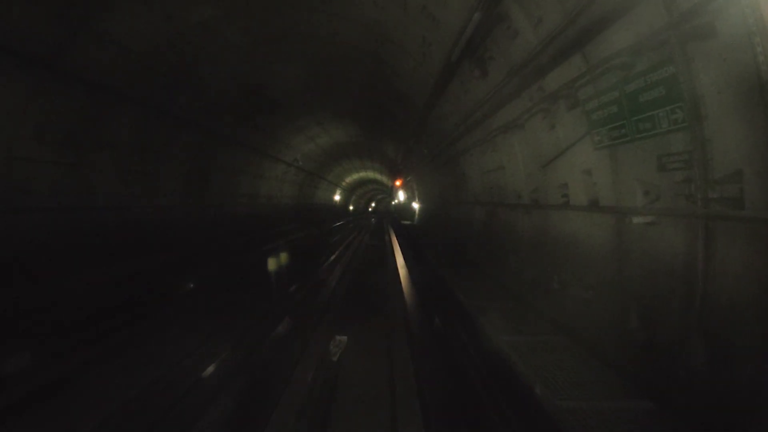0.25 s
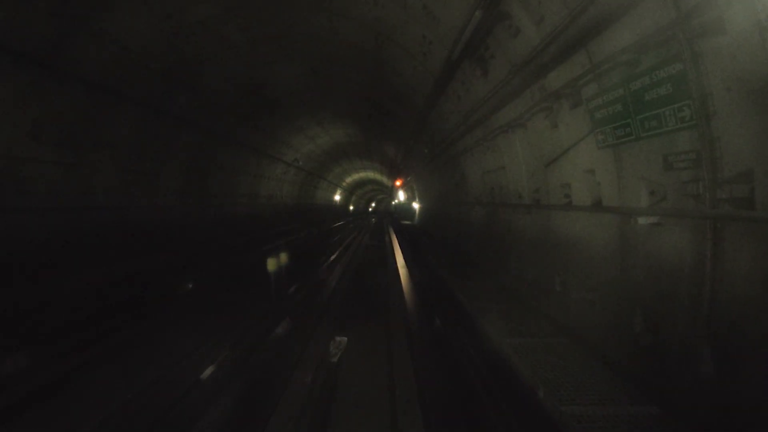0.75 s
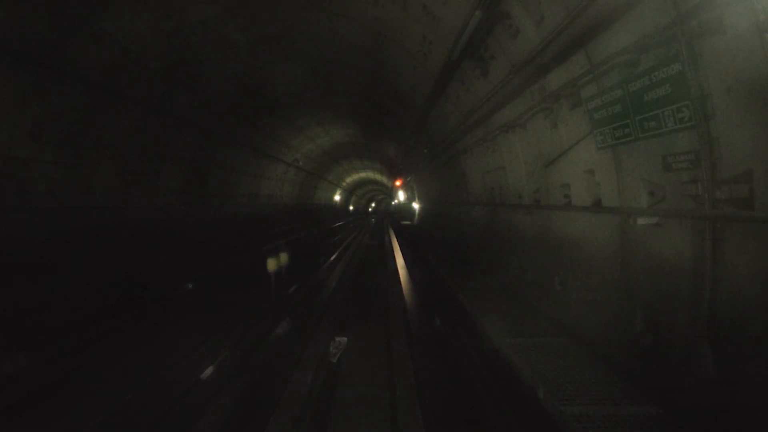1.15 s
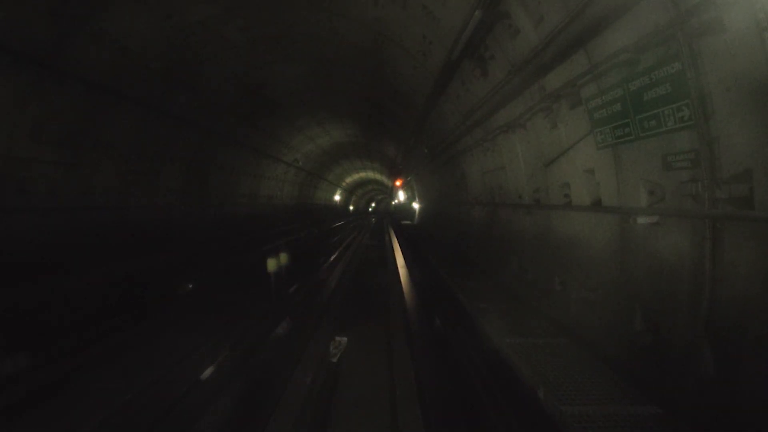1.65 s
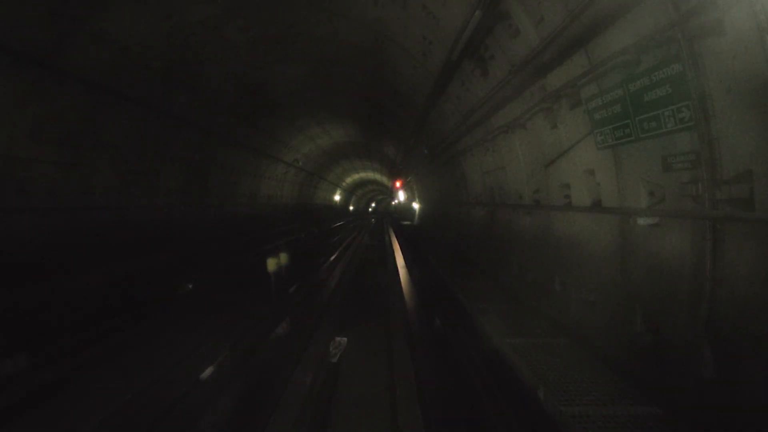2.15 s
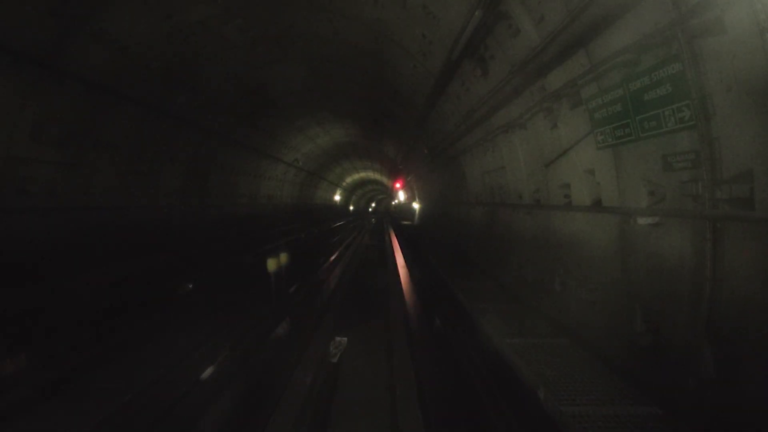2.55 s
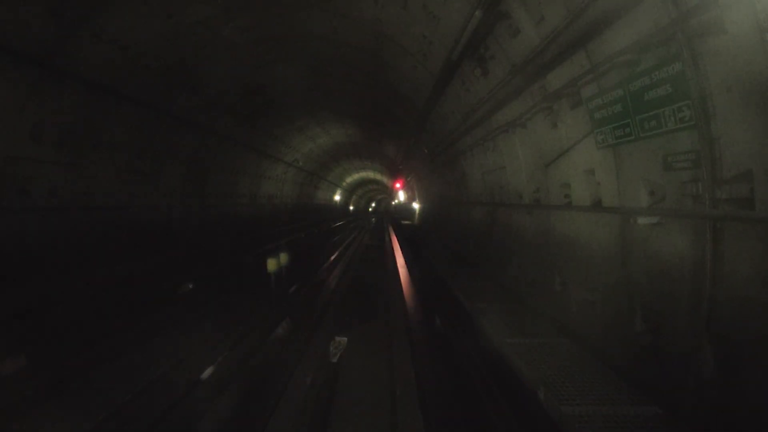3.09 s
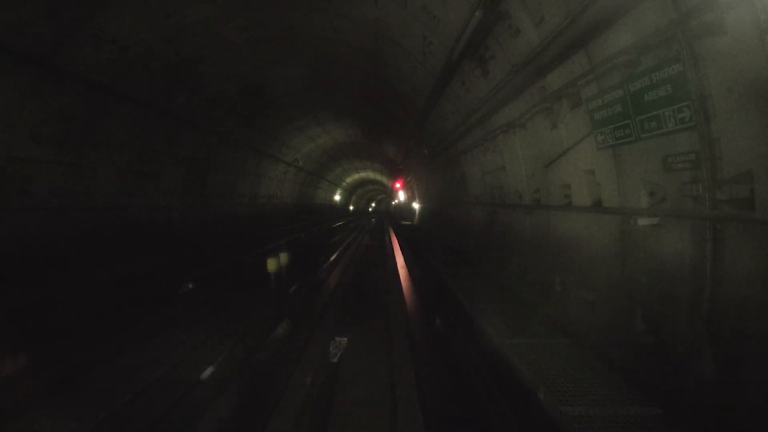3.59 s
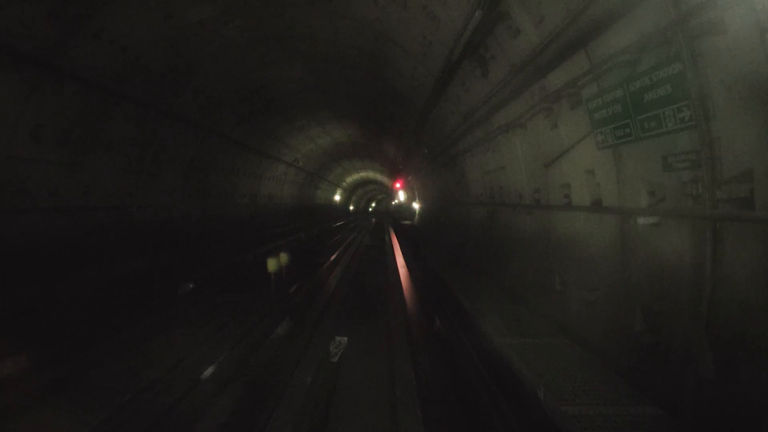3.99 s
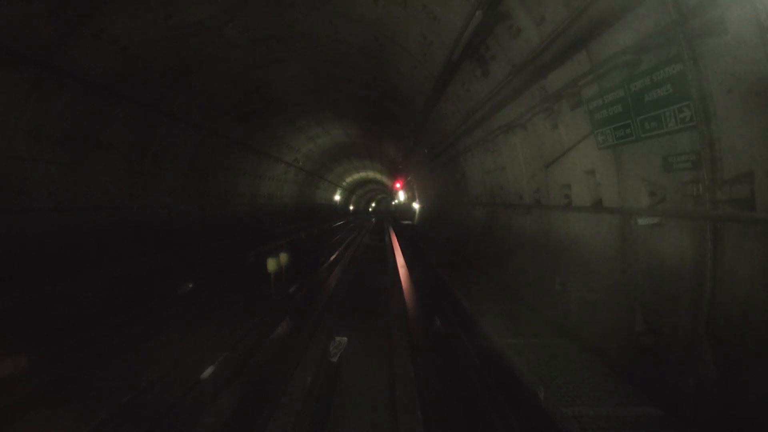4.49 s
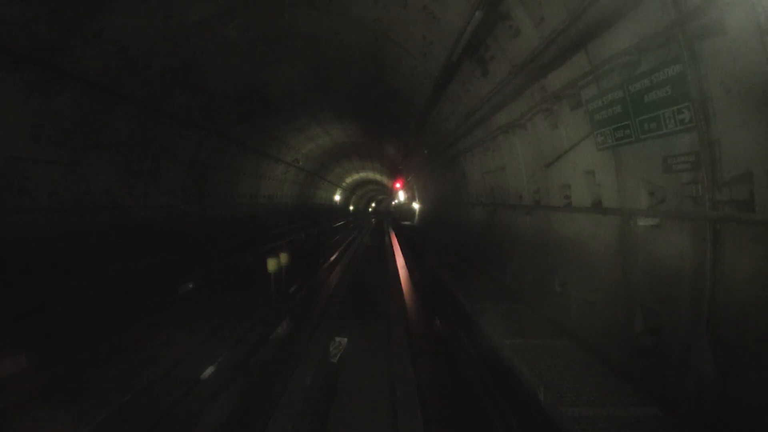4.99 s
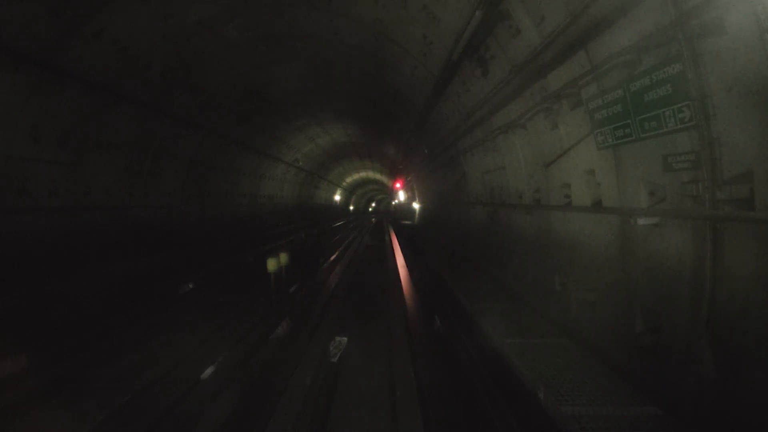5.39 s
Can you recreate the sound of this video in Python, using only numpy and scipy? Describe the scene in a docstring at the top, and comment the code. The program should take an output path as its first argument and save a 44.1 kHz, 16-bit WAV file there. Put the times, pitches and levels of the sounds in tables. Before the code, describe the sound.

A wide, close stereo pickup inside a train car. At first it is quiet: airy hiss, low shudder, one dull knock and tiny squeaks. A low electric hum sounds for about half a second and is cut off by hard knocks. A loud muffled rumble and tumbling thumps follow, easing into scattered rattling clanks, short scrapes, brief squeaks and a thin whine over hiss.

```python
"""Inside a metro carriage

A metro carriage stands in a tunnel, heard from inside in wide stereo.
The body shudders and rumbles and ventilation hisses: both are noise shaped in pitch and level.
A motor hum, an electrical whine and short squeaks are wavering sines; rough squeaks blur into hiss.
Knocks are short fading rings; scrapes and clanks are noise bursts, partly rung through resonances.
"""
import sys
import numpy as np
from scipy import signal
from scipy.fft import rfft, irfft
from scipy.io import wavfile
from scipy.ndimage import uniform_filter1d

SR = 44100
rng = np.random.default_rng(int(sys.argv[2]) if len(sys.argv) > 2 else 0)


def int16_out(signal):
    """Quantize to a 16-bit WAV file."""
    q = np.round(np.clip(np.atleast_2d(signal).T, -1, 1) * 32767)
    wavfile.write(sys.argv[1], SR, q.astype(np.int16))


N = 248724

# spectrum of the lumpy panel rumble, also mixed into the thuds: (frequency [Hz], density [dB per Hz])
RUMBLE_COLOUR = [(150, -44), (220, 0.5), (280, 0), (420, -1.5), (500, -2.5), (620, -8), (740, -3),
                 (900, -10.5), (990, -21.5), (1500, -17.5), (2200, -40), (4000, -67)]


def gain_of(db):
    """Turns decibels into a factor on the wave."""
    return 10 ** (np.asarray(db) / 20)


def evened(x):
    """Scales a signal to an average strength (rms) of 1."""
    return x / np.sqrt(np.mean(x ** 2) + 1e-20)


def smoothed_twice(x, size):
    """Averages over neighbouring samples two times, which leaves only slow changes."""
    return uniform_filter1d(uniform_filter1d(x, size=size), size=size)


def read(points, hz):
    """Reads a curve over frequency, with straight lines on a logarithmic frequency axis."""
    f, value = np.transpose(points)
    return np.interp(np.log(hz + 1), np.log(f + 1), value)


def follow(rows, column=1):
    """Reads one column of a table over time at every sample."""
    rows = np.asarray(rows)
    return np.interp(np.arange(N) / SR, rows[:, 0], rows[:, column])


def field(colour, size, patchy_db, flicker_db):
    """Wide stereo noise with drifting patches and a flicker shared by all pitches."""
    # likeness of left and right, swinging with pitch as in a widened stereo sound:
    # (frequency [Hz], likeness [-1 to 1])
    likeness = [(180, .97), (270, .8), (500, .72), (620, .45), (800, .5), (930, -.2), (1100, -.8),
                (1250, -.72), (1500, -.4), (1750, 0), (1950, .7), (2250, .63), (2600, 0), (2850, -.23),
                (3700, -.05), (4350, .18), (4900, -.35), (5400, .1)]
    hop = size // 2
    frames, hz = N // hop + 5, np.fft.rfftfreq(size, 1 / SR)
    a, b, c, d, patches = np.ascontiguousarray(rng.standard_normal((frames, len(hz), 5)).T)
    patches = uniform_filter1d(patches, size=8, axis=0)  # neighbouring pitches
    patches = evened(uniform_filter1d(patches, size=5, axis=1))  # neighbouring moments
    flicker = evened(uniform_filter1d(rng.standard_normal(frames), size=3))
    same = read(likeness, hz)[:, None]
    mid = np.sqrt(1 + same) * (a + 1j * b)  # equal in left and right
    side = np.sqrt(1 - same) * (c + 1j * d)  # opposite in left and right
    level_db = read(colour, hz)[:, None] + patchy_db * patches + flicker_db * flicker
    spectra = np.array([mid + side, mid - side]) * gain_of(level_db)
    noise = signal.istft(spectra, window="cosine", nperseg=size, noverlap=hop)[1]
    return evened(noise[:, :N])


def tilted(colour, level_db, tilt_db, part, **texture):
    """Noise on a level curve; one part of its spectrum is raised or lowered."""
    noise = field(colour, **texture)
    chosen_part = signal.sosfiltfilt(part, noise)
    return gain_of(level_db) * (noise + (gain_of(tilt_db) - 1) * chosen_part)


def tone(hz, rows, waver_db, width_hz, right_gain):
    """A near sine whose level wavers and whose pitch wanders over a small width."""
    t = np.arange(N) / SR
    on = uniform_filter1d(1. * (t >= rows[0][0]) * (t <= rows[-1][0]), size=400)  # soft switch on and off
    waver, wander = smoothed_twice(rng.standard_normal((2, N)), 500)
    turns = np.cumsum(hz + width_hz * evened(wander)) / SR
    wave = np.sqrt(2) * np.sin(2 * np.pi * turns)
    level = gain_of(follow(rows) + waver_db * evened(waver))
    return np.outer([1, right_gain], on * level * wave)


def rung(x, modes):
    """Passes a sound through resonances (modes), each of which favours the pitches near its own."""
    hz = np.fft.rfftfreq(N, 1 / SR)
    response = sum(gain_of(db) / (1 + 2j * (hz - f) / width) for f, width, db in modes)
    return evened(irfft(rfft(x) * response, N))


def body():
    """One shaking drives the low shudder and the lumpy panel rumble; harder shaking dulls the rumble."""
    # how hard the body shakes: (time [s], panel rumble [dB], change of the shudder under 90 Hz [dB])
    shaking = [(0.0, -30, -13), (0.1, -35, 6), (0.85, -36, 5.5), (1.05, -31.5, -2), (1.12, -29.5, 19),
               (1.35, -32, 9), (1.55, -31.5, 7), (1.7, -33, 6), (1.98, -31, 3), (2.05, -29.5, 6),
               (2.15, -23, 9), (2.35, -23, 9), (2.55, -15.5, -2), (2.75, -19.5, 2), (2.95, -16.5, 2),
               (3.15, -18.5, 3), (3.3, -17, 6), (3.5, -24.5, -7), (4.2, -24, 0), (4.6, -26, -1),
               (4.92, -24.5, -2), (5.64, -25.5, 5)]
    # spectrum of the shudder: (frequency [Hz], density [dB per Hz])
    boom_colour = [(20, -45), (40, -31), (70, -18.5), (100, 5), (140, 7), (190, 3.5), (240, -8),
                   (320, -55.5)]
    shudder_db = -1  # shudder against the panel rumble
    quiet_db, quiet_bright_db = -41, 3  # a quiet shake level, and the lift over 550 Hz at that level
    dulling = 0.3  # dB lost over 550 Hz per dB of shake
    deep = signal.butter(3, 90, fs=SR, output="sos")
    bright = signal.butter(3, 550, "high", fs=SR, output="sos")
    shake_db = follow(shaking)
    shudder = tilted(boom_colour, shake_db + shudder_db, follow(shaking, column=2), deep,
                     size=2048, patchy_db=0.87, flicker_db=0.4)
    brightness_db = quiet_bright_db - dulling * (shake_db - quiet_db)
    rumble = tilted(RUMBLE_COLOUR, shake_db, brightness_db, bright, size=1024, patchy_db=1.4, flicker_db=0.8)
    return shudder + rumble


def air():
    """Ventilation: a rush of noise whose brightness changes, and a separate high fizz."""
    # air noise: (time [s], rush [dB], change of the rush over 2500 Hz [dB], fizz [dB])
    air_levels = [(0.0, -42.5, 5.5, -47), (0.2, -43.5, 2.5, -46.5), (0.42, -41.5, 3.5, -45),
                  (0.51, -43, 8, -44), (0.58, -44, 5, -47.5), (0.8, -47.5, 7.5, -51.5),
                  (1.08, -44, 4.5, -49), (1.26, -41.5, 4, -48.5), (1.42, -43.5, 4.5, -48.5),
                  (1.5, -45, 1.5, -52), (2.2, -41, -0.5, -48), (2.5, -36.5, -2, -52.5),
                  (2.8, -33, -6, -44.5), (3.15, -34.5, -2, -43), (3.6, -36.5, -5, -48),
                  (4.6, -38, -2.5, -51.5), (5.64, -38, -5, -54.5)]
    # spectra of the rush and of the fizz: (frequency [Hz], density [dB per Hz])
    rush_colour = [(500, -60), (1000, 2), (1500, 4), (2000, -3), (2600, -3), (3400, -5.5), (4700, -8.5),
                   (5500, -18.5), (6800, -15), (7200, -41), (9000, -54), (11000, -39)]
    fizz_colour = [(6000, -4), (8000, -7), (9500, -9.5), (11400, -6), (11800, -3.5), (13500, -8),
                   (14300, -18), (15500, -16)]
    bright = signal.butter(3, 2500, "high", fs=SR, output="sos")
    rush = tilted(rush_colour, follow(air_levels), follow(air_levels, column=2), bright,
                  size=512, patchy_db=1.5, flicker_db=0.8)
    fizz = field(fizz_colour, size=512, patchy_db=2.5, flicker_db=-1.0)
    return rush + fizz * gain_of(follow(air_levels, column=3))


def electrical_whine():
    """A thin sine that fades and returns, gliding in pitch and wandering around the glide."""
    # whine: (time [s], level at left [dB], pitch [Hz], typical wander [Hz])
    whine_rows = [(0, -52, 1418, 9), (.7, -53, 1414, 9), (1.1, -53, 1420, 9), (1.82, -49, 1426, 6),
                  (1.95, -58, 1426, 9), (4.4, -56, 1392, 5), (4.55, -49, 1400, 5), (4.8, -47, 1411, 2),
                  (5.05, -46.5, 1418, 1.5), (5.2, -43, 1421, 1.5), (5.64, -43.5, 1427, 1.5)]
    return tone(follow(whine_rows, column=2), whine_rows, 1.5, follow(whine_rows, column=3), 0.6)


def squeak(s, db, hz, rough, swell, fade):
    """A thin tone swells and fades; uneven slipping blurs it, into a band of hiss when very rough."""
    low_db = db - 14  # where it starts and ends
    slip_s = 0.007  # length of one slip in a clean squeak; rougher ones slip faster
    grip = round(slip_s * (1 - rough) * SR)
    slips = evened(smoothed_twice(rng.standard_normal(N), grip))
    clean = tone(hz, [(s - swell, low_db), (s, db), (s + fade, low_db)], 1.5, 4, 0.9)
    return clean * (np.sqrt(1 - rough ** 2) + rough * slips)


def squeaks():
    """Adds up the separate squeaks and chafes of the fittings."""
    # squeaks: (loudest at [s], peak level [dB], pitch [Hz], roughness [0-1], swell [s], fade [s])
    squeak_rows = [(.18, -60, 7700, .6, .5, .1), (.96, -49.5, 5115, .2, .15, .12),
                   (1.145, -50, 3000, .4, .03, .2), (1.27, -52, 3040, .5, .08, .1),
                   (1.39, -50, 2450, .6, .14, .06), (.45, -50, 2310, .9, .3, .15),
                   (.5, -51, 4240, .92, .15, .06), (3.87, -38, 1950, .5, .03, .04),
                   (3.9, -41, 2560, .7, .04, .03), (3.94, -41, 1900, .6, .04, .05),
                   (3.635, -37, 4600, .95, .06, .05), (3.885, -42, 3600, .96, .06, .1),
                   (4.686, -43, 4795, .5, .016, .045), (4.775, -55, 4850, .6, .09, .06),
                   (4.852, -38, 4000, .96, .015, .04), (4.92, -39, 3000, .95, .012, .04)]
    return sum(squeak(*row) for row in squeak_rows)


def thumps():
    """Each blow is a short ring with a soft start, its wave a little earlier on the left or the right."""
    # thumps, hollow knocks and metal pings: (start [s], level [dB], pitch [Hz], time to fall 60 dB [s])
    blows = [(.003, -19, 144, 0.076), (1.035, -24, 170, .4), (1.055, -20, 168, 0.33),
             (1.074, -14, 173, 0.18), (1.118, -21, 188, .15), (1.195, -21, 153, .12),
             (1.075, -24.5, 830, 0.12), (1.77, -27, 872, 0.084), (2.105, -17, 396.5, 0.24),
             (2.123, -9, 146, 0.11), (2.141, -8, 401, 0.071), (2.146, -9, 157, 0.1),
             (2.167, -17, 260, 0.051), (2.179, -9.5, 394, 0.093), (2.189, -15.5, 810, 0.1),
             (2.207, -16, 385, 0.12), (2.333, -16, 144.6, 0.58), (2.539, -8, 167.2, 0.28),
             (2.575, -10, 395, 0.15), (2.624, -3, 164, 0.15), (2.711, -9.5, 151, 0.13),
             (2.75, -9.5, 304, 0.073), (2.82, -8, 161, 0.18), (2.848, -9, 306, 0.098),
             (2.885, -4, 187, 0.082), (2.911, -8, 346, 0.083), (2.968, -6.5, 292, 0.072),
             (3.003, -6, 202, 0.025), (3.056, -9.5, 283, .1), (3.084, -8.5, 287, 0.18),
             (3.101, -6.5, 137, 0.12), (3.14, -7, 165, 0.087), (3.146, -10, 280, .07),
             (3.162, -6.5, 295, 0.079), (3.215, -12.5, 137, .09), (3.224, -9, 215, 0.062),
             (3.295, -15, 297, 0.087), (3.33, -11, 257, .09), (3.404, -16, 124, .2),
             (3.584, -16, 1024, 0.03), (3.586, -11.5, 753, 0.071), (3.59, -12.5, 358, 0.095),
             (3.622, -19, 150, 0.11), (3.624, -17, 815, 0.087), (3.676, -17, 396, 0.069),
             (3.678, -14.5, 152, 0.15), (4.002, -15, 177, 0.07), (4.097, -20.5, 119.8, 0.32),
             (4.247, -11.5, 314, 0.16), (4.253, -9, 536, 0.016),
             (4.651, -20.5, 127.4, 0.21),(5.507, -21, 123.5, 0.48)]
    rise_s = 0.0071
    spread_s = 0.00041  # largest lag of the wave between left and right, either way
    t, out = np.arange(SR // 2) / SR, np.zeros((2, N + SR))
    start = np.sin(np.pi / 2 * np.minimum(t / rise_s, 1)) ** 2
    for (s, db, hz, t60), (turn, shift) in zip(blows, rng.random((len(blows), 2))):
        lead_s = spread_s * (shift - 0.5) * np.array([[1], [-1]])
        ring = np.sin(2 * np.pi * (hz * (t + lead_s) + turn))
        fade = gain_of(db - 60 * np.maximum(t - rise_s, 0) / t60)
        at = round(s * SR)
        out[:, at:at + len(t)] += start * fade * ring
    return out[:, :N]


def clank_levels():
    """Each blow or scrape swells to a short crack, then dies; overlapping ones add their power."""
    # clanks: (time near the peak [s], thud [dB], rattle [dB], fizz [dB], sizzle [dB],
    #          time to fall 60 dB [s], left minus right [dB])
    clank_rows = [(0.019, -18, -33, -41, -58, 0.14, -3), (0.527, -47, -38, -40, -60, 0.1, 6),
                  (1.778, -27, -33.5, -60, -58, 0.16, -1), (2.096, -17, -36, -46, -60, 0.22, 3),
                  (2.113, -21, -31, -44, -56, 0.3, -1), (2.13, -16, -30, -44, -54, 0.25, 2),
                  (2.143, -11, -28, -40, -45, 0.13, 2), (2.157, -29, -24, -36, -50, 0.12, 0),
                  (2.172, -12, -21.5, -32.5, -50, 0.12, -5.5), (2.185, -13, -22.5, -32, -40, 0.15, 1),
                  (2.2, -22, -39, -40, -56, 0.096, 4), (2.467, -19.5, -34, -43.5, -48, 1, 1.5),
                  (2.516, -24, -32, -46, -43, 0.16, 3), (2.595, -23, -35, -40.5, -49, 0.2, 4),
                  (2.67, -58, -42, -31, -35, 0.02, 0), (2.753, -45, -48, -53, -52, .2, -1),
                  (2.917, -24, -32.5, -41, -48, 0.24, -4), (3.069, -24, -33, -54, -61, 0.4, -3),
                  (3.229, -23.5, -33, -66, -47, 0.49, -3), (3.297, -17.5, -35, -57, -52, 0.36, 2),
                  (3.387, -25.5, -31.5, -55, -47, 0.32, -2), (3.565, -23, -38, -50, -56, .3, -6),
                  (3.591, -12, -22, -33, -39, 0.23, -2), (3.62, -15.5, -31, -34, -48, 0.14, 3),
                  (3.636, -22.5, -36, -42, -48, 0.55, 1), (3.726, -31, -30, -43, -43, 0.13, -3),
                  (3.847, -26, -33, -59, -68, .6, 0), (3.872, -28, -35, -49, -63, 0.46, 2),
                  (3.9, -46, -35, -54, -57, .4, -6), (3.929, -25, -43, -43, -55, 0.41, 3),
                  (4.078, -20.5, -35, -66, -58, 0.11, 2), (4.152, -23.5, -35, -52, -53, 0.27, -1),
                  (4.219, -21.5, -38, -59, -46.5, 0.099, -5), (4.258, -14.5, -25, -57, -65, 0.14, -3),
                  (4.491, -35, -49, -57, -58, 0.17, -1), (4.535, -35, -35.5, -49, -49, 0.14, -3),
                  (4.845, -25, -27, -30, -40, 0.11, 0), (4.856, -23, -25.5, -29, -41, 0.12, -2),
                  (4.875, -24, -32, -41, -47, .4, -1), (4.913, -20, -26, -30.5, -35, 0.069, 2),
                  (4.925, -21, -28, -37, -41, 0.23, 0.5), (5.084, -21, -27.5, -33, -40, 0.14, 1),
                  (5.105, -27, -32.5, -42.5, -50, 0.29, 0.5), (5.174, -25, -48, -64, -62, 0.26, -2)]
    # swell time of thud, rattle, fizz and sizzle: (share of the time to the peak)
    quickening = np.array([1, .9, .6, .5])[:, None, None]
    quickest_rise_s, rise_per_t60 = 0.007, 0.036  # longer scrapes swell more slowly
    crack_s, crack_share = 0.0012, 0.15
    t = np.arange(SR // 2) / SR
    power = np.zeros((4, 2, N + SR))
    for s, *layers_db, t60, pan_db in clank_rows:
        peak_s = quickest_rise_s + rise_per_t60 * t60
        after = np.maximum(t - peak_s, 0)
        swell = np.clip(1 + (t - peak_s) / (peak_s * quickening), 0, 1)
        tail = (1 - crack_share) * gain_of(-60 * after / max(t60, 0.02))
        crack = crack_share * np.exp(-after / crack_s)
        level = gain_of(np.array(layers_db)[:, None] + np.array([pan_db, -pan_db]) / 2)
        at = max(round((s - 0.78 * peak_s) * SR), 0)
        power[:, :, at:at + len(t)] += (level[:, :, None] * swell * (tail + crack)) ** 2
    return np.sqrt(power[:, :, :N])


def clanks():
    """Blows and scrapes shake the panels, ring the fittings and fizz: four noises on the clank levels."""
    # what the panels and the metal fittings ring with: (frequency [Hz], width [Hz], strength [dB])
    panels = [(170, 130, 9), (263, 30, -32), (400, 45, 6.5), (568, 24, 1), (750, 36, -16), (736, 110, 0),
              (1160, 110, -3.5)]
    fittings = [(1150, 61, 12), (1650, 43, 19.5), (1800, 130, -34), (2420, 360, 11.5), (2920, 300, -9),
                (3480, 960, -6), (4320, 700, -5)]
    # spectra of rattle, fizz and sizzle: (frequency [Hz], density [dB per Hz])
    rattle_colour = [(600, 11.5), (1000, 0.5), (1700, 1), (2500, 3), (3500, 0.5), (4800, -5), (6000, -8),
                     (8000, -32)]
    splash_colour = [(2500, -20), (3200, 5), (4200, 2), (5500, 0.5), (7000, 1), (8500, -5), (10000, -10),
                     (11500, -26)]
    sizzle_colour = [(8000, -37), (10000, -2), (11500, -1), (12000, 6), (13300, -8), (14000, -6),
                     (15400, -13)]
    grit_db = 1.5  # tiny impacts inside a scrape make its treble jump
    thud_colour = [(50, -30), (100, -5), (2000, -3), (3000, -30)]  # as the spectra above
    panel_ring = rung(field(thud_colour, size=1024, patchy_db=1.1, flicker_db=1.2), panels)
    panel_noise = field(RUMBLE_COLOUR, size=1024, patchy_db=1.5, flicker_db=1.2)
    thud = evened(0.7 * panel_ring + 0.7 * panel_noise)
    rattle = field(rattle_colour, size=256, patchy_db=1.8, flicker_db=0.6)
    rattle = evened(0.8 * rattle + 0.4 * rung(rattle, fittings))
    fizz = field(splash_colour, size=256, patchy_db=2.5, flicker_db=1)
    sizzle = field(sizzle_colour, size=256, patchy_db=2, flicker_db=1)
    impacts = evened(uniform_filter1d(rng.exponential(1, N) ** 2 - 2, size=60))
    grit = evened(gain_of(grit_db * impacts))
    layers = [thud, grit * rattle, grit * fizz, grit * sizzle]
    return (clank_levels() * layers).sum(0)


def motor_hum():
    """A steady low sine and its weaker, less steady octave follow one level curve."""
    # hum: (time [s], level of the low sine at left [dB])
    hum_rows = [(1.53, -29.5), (1.62, -21.5), (1.76, -18.5), (1.845, -21), (1.895, -16.5), (1.97, -19.5),
                (2.055, -17.5), (2.1, -17), (2.15, -19), (2.175, -28)]
    hum_hz = 140.4
    low = tone(hum_hz, hum_rows, 0.19, 0.12, 0.89)
    octave = tone(2 * hum_hz, hum_rows, 2.3, 5.4, 0.63)
    return low + gain_of(-25) * octave


def scene():
    """Adds up body, air, tones, thumps and clanks."""
    steady = body() + air() + electrical_whine()
    return steady + squeaks() + thumps() + clanks() + motor_hum()


def record(dry):
    """Left and right differ in colour and weaken at both ends; peaks round off; then the top is cut."""
    # colour difference of left and right: (frequency [Hz], left minus right [dB])
    lean = [(100, -.5), (500, -.5), (1000, -3), (1700, -3), (2600, -1.5), (3800, 3), (5500, 0.5),
            (7500, -4), (9200, -0.5), (11400, 8), (12600, 13), (13300, 11), (14200, 28)]
    # roll-off at both ends of the range: (frequency [Hz], gain [dB])
    roll_off = [(25, -6), (45, 0), (14000, 0), (14400, -3), (14700, -17), (15600, -27)]
    edge_hz = 15520
    hz = np.fft.rfftfreq(N, 1 / SR)
    colour_db = np.outer([0.5, -0.5], read(lean, hz)) + read(roll_off, hz)
    coloured = irfft(rfft(dry) * gain_of(colour_db), N)
    rounded = np.tanh(coloured)
    low_pass = signal.firwin(511, edge_hz, window=("kaiser", 12), fs=SR)
    return signal.oaconvolve(rounded, low_pass[None], "same")


dry = scene()
out = record(dry)
int16_out(out)
```